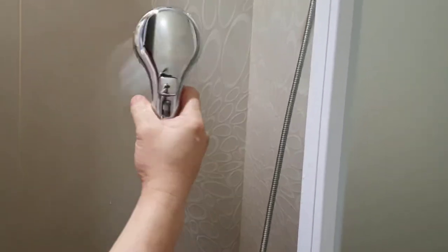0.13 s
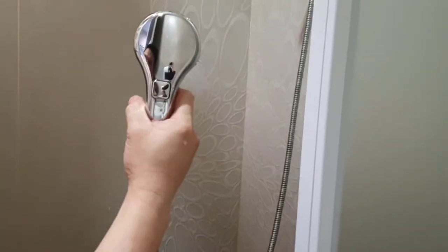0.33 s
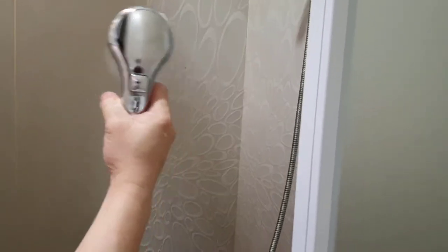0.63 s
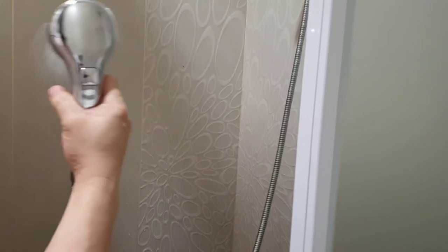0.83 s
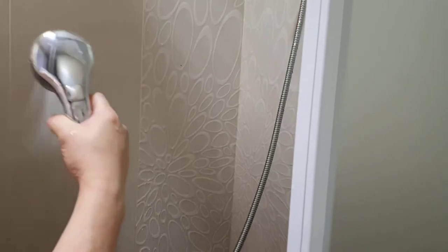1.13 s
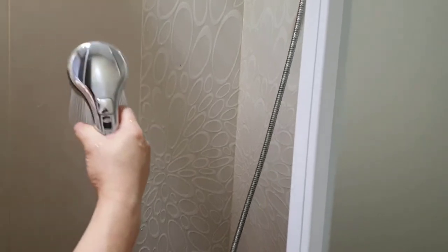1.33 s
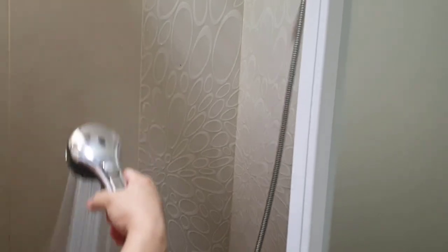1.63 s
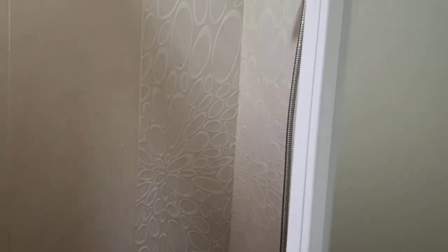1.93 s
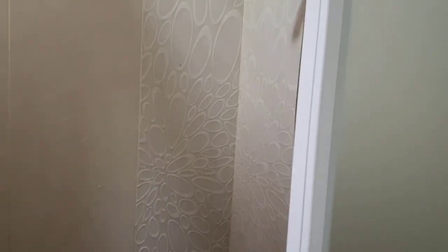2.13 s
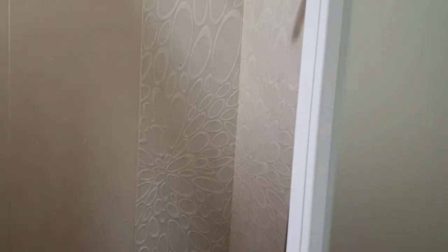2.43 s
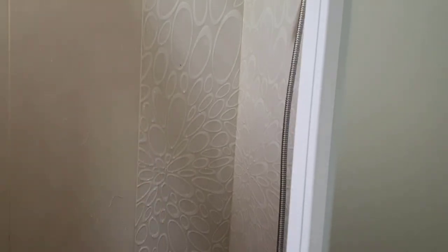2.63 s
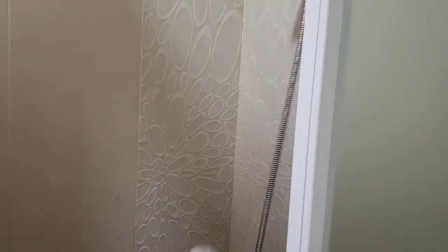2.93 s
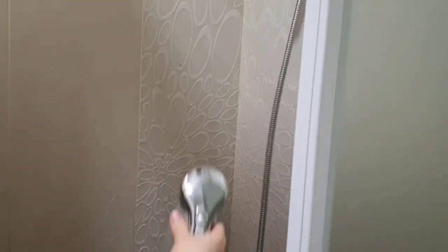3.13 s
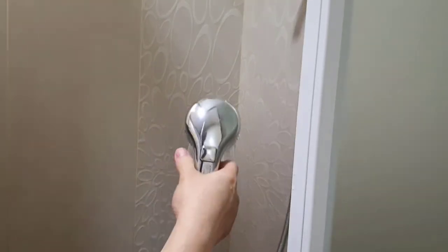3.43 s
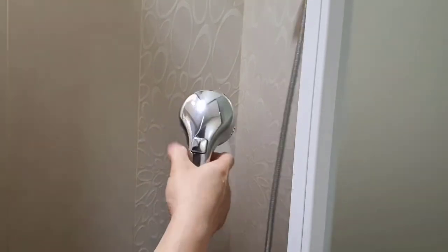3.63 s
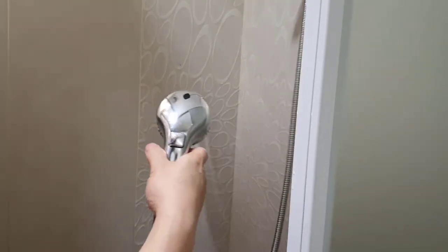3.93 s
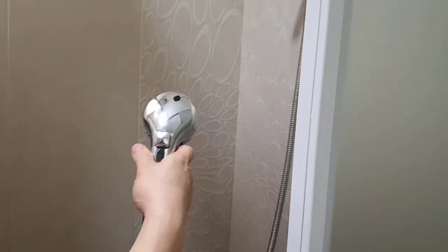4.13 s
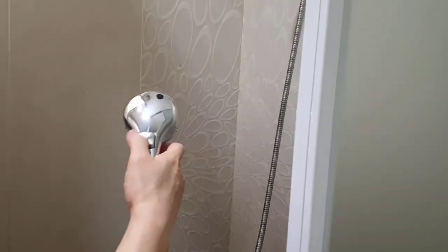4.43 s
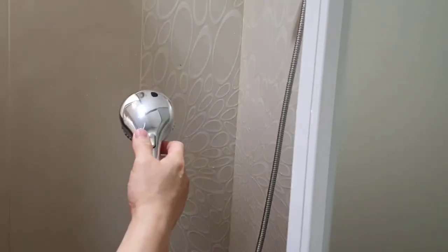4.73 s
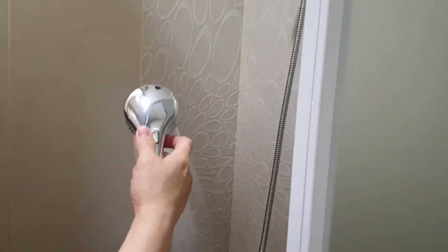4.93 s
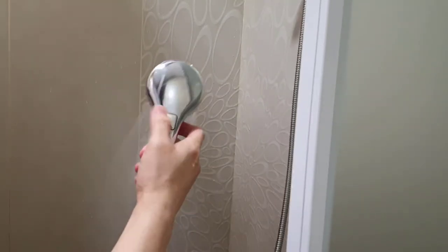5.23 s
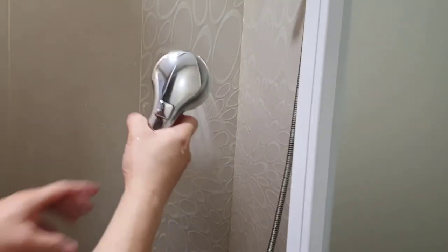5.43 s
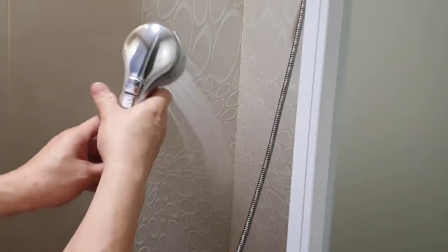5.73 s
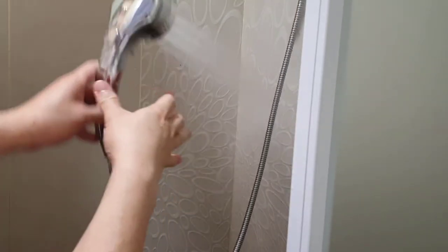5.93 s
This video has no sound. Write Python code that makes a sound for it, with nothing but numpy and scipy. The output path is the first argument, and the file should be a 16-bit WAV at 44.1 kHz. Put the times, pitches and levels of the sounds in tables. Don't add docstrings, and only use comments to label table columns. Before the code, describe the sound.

Hissing shower jets sweep across tile and wet floor with a few watery gulps, pause briefly leaving a low fan hum, then spray again.

```python
import sys
import numpy as np
from scipy import signal
from scipy.fft import rfft, irfft, next_fast_len
from scipy.io import wavfile
from scipy.ndimage import uniform_filter1d

SR = 44100
rng = np.random.default_rng(int(sys.argv[2]) if len(sys.argv) > 2 else 0)


def transcribe(signal):
    frames = np.atleast_2d(signal).T
    limited = np.clip(frames, -1, 1)
    pcm = np.round(limited * 32767).astype(np.int16)
    wavfile.write(sys.argv[1], SR, pcm)


def ratio(d):
    e = np.asarray(d, float) / 20
    return 10 ** e


N = 268745

# f/Hz, level/dB per Hz
AIR_COLOUR = [(45, -15), (90, -5.5), (125, -5), (158, -22.5), (200, -17.5), (300, -18), (390, -24),
              (500, -21.5), (1000, -30.5), (1900, -31), (3500, -46), (7500, -51), (11800, -51),
              (12800, -95)]
# f/Hz, width/Hz, level/dB rms
ROOM_MODES = [(131.9, 9.3, -47.5), (179.5, 14.6, -51.5), (215.2, 9.8, -55.5), (250.4, 9.5, -53),
              (283.9, 11.4, -55), (311.7, 8, -57.5), (610, 39, -61.5), (852, 133, -59.5), (1298, 59, -68.5),
              (1460, 11, -66), (1730, 20, -70), (1917, 16, -70)]
# t/s, peak level/dB
HUM_SWELLS = [(.36, -43.5), (.56, -40), (.82, -37.5), (1.22, -34), (1.42, -36.5), (1.64, -36), (1.9, -37.5),
              (2.09, -40), (2.33, -37.5), (2.63, -34.5), (2.75, -35), (3.05, -34.5), (3.26, -38),
              (3.7, -45), (3.91, -36), (4.34, -36.5), (4.87, -39), (5.2, -33.5), (5.42, -34), (5.64, -36),
              (5.87, -36.5)]
# t/s, peak level/dB
GUSTS = [(.16, -39), (.39, -35), (.46, -56), (.6, -52), (.8, -39), (1.2, -35), (1.55, -44), (1.84, -40),
         (2.0, -38), (2.28, -38), (2.47, -41), (2.61, -34), (3.04, -35.5), (3.26, -48), (3.39, -37),
         (3.76, -34.5), (4.02, -37), (4.34, -37), (4.53, -34), (4.69, -31.5), (4.89, -40), (5.18, -39),
         (5.33, -37.5), (5.5, -34), (5.72, -32), (5.89, -34)]
# f/Hz, correlation/1
EAR_LIKENESS = [(60, 1), (130, 0.91), (290, 0.7), (640, 0.56), (1410, -0.17), (3100, -0.0097),
                (6820, -0.018), (15000, -0.0062)]
# f/Hz, left minus right/dB
EAR_LEAN = [(60, 8), (110, -1.5), (200, -5), (380, 1), (700, -1.5), (1290, -1), (2380, -2.5), (4400, -2.5),
            (8120, -4.5), (15000, 0)]
# t/s, peak level/dB, f/Hz
GULPS = [
    (2.645, -23.5, 830),
    (2.724, -37, 930),
    (2.783, -22.5, 834),
    (3.234, -30, 1043),
    (3.392, -26, 1287),
]
# f/Hz, level/dB per Hz
PANEL_DULL = [(400, -4.5), (700, 0.5), (860, 3), (1050, 1), (1300, 6.5), (2000, -35)]
# f/Hz, level/dB per Hz
PANEL_BRIGHT = [(900, -20), (1300, -3.5), (1500, 0.5), (1750, 3), (2100, 0.5), (2600, -10.5), (3800, -15)]
# t/s, hold/s, drumming level/dB, dull part relative to it/dB
CROSSINGS = [
    (1.848, 0.026, -48, -11),
    (2.5, .04, -49, -12),
    (2.689, 0.035, -35, -5.5),
    (2.793, 0.023, -49, 4),
    (3.223, 0.044, -45, -3),
    (3.307, 0.034, -41, -7),
    (3.402, .06, -42.5, -3.5),
    (4.0, 0.038, -51, -12),
    (4.863, .04, -50.5, -16),
]
# f/Hz, level/dB per Hz
PATTER_COLOUR = [(1000, -26), (1700, -14), (2200, -4.5), (2800, -6), (3250, -5), (4000, -2.5), (4600, -4.5),
                 (7000, -16)]
# f/Hz, width/Hz, level/dB
HOLLOWS = [(3195, 89, -5.5), (3000, 130, -14), (3344, 120, -6.5), (5100, 150, -14), (2740, 120, -9),
           (1980, 160, -22.5)]
# t/s, hold/s, singing above usual/dB
DWELLS = [
    (1.3, 0.3, 4.5),
    (1.78, .06, 6.5),
    (2.157, 0.027, 6),
    (2.24, 0.51, 11),
    (2.952, 0.16, 10),
    (3.687, 0.081, 11),
    (5.055, 0.14, 5.5),
]
# f/Hz, level/dB per Hz
MIST_COLOUR = [(1800, -24.5), (3500, -29), (4900, -2.5), (6000, -3), (7300, 0.), (8600, -3.5), (10500, -11),
               (12800, -34)]
# f/Hz, level/dB per Hz
NOZZLE_BODY = [(2500, -31.5), (4500, -33), (8500, -19.5), (9800, -3.5), (11500, -1.5), (12500, -6),
               (14500, -13)]
# f/Hz, level/dB per Hz
NOZZLE_TOP = [(9000, -36), (12000, -11), (13300, 3), (14300, -3), (15500, -0.5), (17000, -10.5)]
# t/s, landing force level/dB, aim down to the floor/0-1, turn to the listener/0-1
SWEEP = [(0.0, -39.5, 0.46, 0.67), (0.4, -40.5, 0.37, 0.58), (0.8, -46.5, 0.54, 0.67),
         (1.09, -42.5, 0.3, 0.6), (1.22, -37, 0.34, 0.64), (1.44, -39.5, 0.5, .4),
         (1.72, -34.5, 0.61, 0.47), (1.85, -31, 0.66, .4), (2.0, -36, 0.87, 0.5), (2.4, -33.5, 0.72, 0.48),
         (2.82, -35, 0.9, 0.56), (3.12, -32.5, .6, 0.6), (3.35, -31.5, 0.92, 0.45),
         (3.44, -35.5, 0.85, 0.55), (3.85, -33.5, 0.87, 0.32), (5.2, -34.5, 0.51, 0.58),
         (5.52, -37, 0.45, 0.44), (6.09, -36.5, 0.45, 0.62)]
# t/s, level/dB
FLICKS = [
    (.38, 2),
    (.62, -0.5),
    (1.28, 1.5),
    (2.2, 0),
    (2.68, 1),
    (3.0, 0),
    (3.78, 0.5),
    (3.99, 0),
    (5.24, 1.5),
    (5.939, 1),
]

PRESS_S, CUT_DB_PER_S, CUT_DEPTH_DB, DRAIN_DB_PER_S = 3.995, 116, 24, 39
DRIBBLE_S, DRIBBLE_WIDTH_S, DRIBBLE_DB = 4.28, 0.029, 3
LET_GO_S, RISE_S, SURGE_DB, SURGE_DECAY_S = 4.785, 0.086, 3, 0.076
LIFT_S, LIFT_DB_PER_S = 5.977, 59
JETS_BREAK_DB = 31
STALL_T60_S = 0.24


def rms_one(x):
    return x / np.sqrt(np.mean(x ** 2) + 1e-20)


def at_hz(points, hz):
    table_hz, values = np.array(points).T
    return np.interp(np.log(hz), np.log(table_hz), values)


def in_time(rows):
    s, *columns = np.transpose(rows)
    return [np.interp(np.arange(N) / SR, s, c) for c in columns]


def drift(rate):
    r = np.exp(-80 * np.pi * rate / SR)
    noise = rng.standard_normal(N // 40 + 2002)
    slow = signal.lfilter([1], [1, -2 * r, r * r], noise)[2000:]
    return np.interp(np.arange(N) / 40, np.arange(len(slow)), rms_one(slow))


def swell(start_s, hold_s, in_s, out_s):
    corners_s = start_s + np.cumsum([-in_s, in_s, hold_s, out_s])
    return np.interp(np.arange(N) / SR, corners_s, [0, 1, 1, 0])


def bumps(rows, width_s, rest_db):
    t = np.arange(0, N, 64) / SR
    s, db = np.transpose(rows)
    gain = ratio(rest_db) + ratio(db) @ np.exp(-((t - s[:, None]) / width_s) ** 2)
    return np.interp(np.arange(N) / SR, t, gain)


def resonance(x, hz, width_hz):
    r = np.exp(-np.pi * width_hz / SR)
    poles = [1, -2 * r * np.cos(2 * np.pi * hz / SR), r * r]
    return signal.lfilter([(1 - r * r) / 2, 0, (r * r - 1) / 2], poles, x)


def coloured(pair, spectrum):
    size = next_fast_len(N)
    hz = np.arange(size // 2 + 1) * SR / size + 1
    alike = np.clip(at_hz(EAR_LIKENESS, hz), -1, 1)
    (low_hz, low_db), (high_hz, high_db) = spectrum[0], spectrum[-1]
    closed = [(low_hz / 2, low_db - 25), *spectrum, (high_hz * 1.5, high_db - 50)]
    mid, side = rfft(pair, size) * ratio(at_hz(closed, hz))
    ears = np.sqrt(1 + alike) * mid + np.sqrt(1 - alike) * side * [[1], [-1]]
    lean_db = at_hz(EAR_LEAN, hz) * [[0.5], [-0.5]]
    out = irfft(ears * ratio(lean_db), size)[:, :N]
    return out / np.sqrt(np.mean(out.mean(axis=0) ** 2))


def echoes(x, step=30000):
    t = np.arange(round(0.22 * SR)) / SR
    out = np.zeros((2, N + len(t) + 3 * step))
    fade = np.hanning(2 * step)
    padded = np.pad(x, ((0, 0), (step, 2 * step)))
    for i in range(0, N + step, step):
        tail = rng.standard_normal((2, len(t))) * ratio(-60 * t / STALL_T60_S)
        piece = padded[:, i:i + 2 * step] * fade
        out[:, i:i + 2 * step + len(t) - 1] += signal.fftconvolve(piece, tail, axes=1)
    return rms_one(out[:, step:step + N])


def impacts(per_s, spread_db, smear_db, echo_db=None):
    sizes = ratio(spread_db * np.minimum(rng.exponential(1, (2, N)), 5))
    sizes = sizes * rng.choice([-1, 1], (2, N))
    hits = rms_one(sizes * (rng.random((2, N)) < per_s / SR))
    wash = hits + ratio(smear_db) * rng.standard_normal((2, N))
    return wash if echo_db is None else wash + ratio(echo_db) * echoes(hits)


def water(level_db, spectrum, excitation, flicker_db):
    flicker = flicker_db * (drift(12.4) + drift(28))
    return ratio(level_db + flicker) * coloured(excitation, spectrum)


def duct_hum():
    hz = 100.74 + 1.46 * drift(3.93)
    phase = 2 * np.pi * np.cumsum(hz) / SR + [[0], [0.3]]
    return np.sqrt(2) * bumps(HUM_SWELLS, width_s=0.077, rest_db=-45) * np.sin(phase)


def duct_buffeting(white):
    buffet_hz, width_hz = 60.9, 27.72
    lumps = resonance(resonance(white.mean(axis=0), buffet_hz, width_hz), buffet_hz, width_hz)
    even = lumps / np.sqrt(uniform_filter1d(lumps ** 2, size=3500))
    lumps = bumps(GUSTS, width_s=0.033, rest_db=-35) * even
    return np.array([lumps, np.roll(lumps, 30)])


def ventilation():
    out = ratio(-42.5) * coloured(rng.standard_normal((2, N)), AIR_COLOUR)
    white = coloured(rng.standard_normal((2, N)), [(20, 0), (2000, 0), (4000, -40)])
    for hz, width, db in ROOM_MODES:
        wide = width * 1.31
        out = out + ratio(db) * rms_one(resonance(resonance(white, hz, wide), hz, wide))
    return out + (duct_hum() + duct_buffeting(white)) * ratio([[-1.6], [1.4]])


def gulps():
    out = np.zeros((2, N))
    t = np.arange(round(0.08 * SR)) / SR
    envelope = (1 - np.exp(-t / 0.003)) * np.exp(-t / 0.021)
    for s, db, hz in GULPS:
        tone = np.sin(2 * np.pi * hz * t * (1 + 0.27 * t)) * envelope
        at = round(s * SR)
        out[:, at:at + len(t)] += ratio(db - 11.5) * tone * ratio([[-1.5], [1.5]])
    return out


def panel():
    rest_db = -63.5
    drum_rises, dull_rises = [], []
    for s, hold, db, dull_rel_db in CROSSINGS:
        shape = swell(s, hold, in_s=0.14, out_s=0.14)
        drum_rises.append(shape * (db - rest_db))
        dull_rises.append(shape * (db + dull_rel_db - rest_db))
    drum_db = rest_db + np.max(drum_rises, axis=0)
    dull_db = rest_db + np.max(dull_rises, axis=0)
    dull_hits = impacts(500, spread_db=3.5, smear_db=3.5)
    bright_hits = impacts(900, spread_db=4.0, smear_db=4.5, echo_db=-6.0)
    dull = water(dull_db - 2, PANEL_DULL, dull_hits, flicker_db=-1.5)
    return dull + water(drum_db - 3.5, PANEL_BRIGHT, bright_hits, flicker_db=2.24)


def patter(force_db, aim, landing_db):
    drip_db = -38
    floor_db = force_db - 13.5 + 11 * aim
    floor_db = floor_db + np.maximum(0.98 * landing_db, drip_db) + 0.46 * np.maximum(landing_db, 0)
    dwell_db = sum(db * swell(s, hold, in_s=0.034, out_s=0.2) for s, hold, db in DWELLS)
    sing_db = floor_db - 8.5 + dwell_db
    drops = coloured(impacts(2500, spread_db=2.5, smear_db=-2.0, echo_db=4), PATTER_COLOUR)
    singing = np.zeros((2, N))
    for hz, width, db in HOLLOWS:
        singing += ratio(db + 8.0 + 0.74 * drift(11.0)) * resonance(drops, hz, width)
    return ratio(floor_db + 0.79 * drift(16)) * drops + ratio(sing_db) * singing


def mist(force_db, flow_db):
    level_db = force_db + 0.99 * flow_db + 0.53 * np.minimum(flow_db + JETS_BREAK_DB, 0)
    hits = impacts(6000, spread_db=2.0, smear_db=1.0, echo_db=3.5)
    return water(level_db, MIST_COLOUR, hits, flicker_db=0.42)


def pressure():
    t = np.arange(N) / SR
    shut = np.maximum(t - PRESS_S, 0)
    drain_s = np.maximum(shut - CUT_DEPTH_DB / CUT_DB_PER_S, 0)
    lost = -np.minimum(CUT_DB_PER_S * shut, CUT_DEPTH_DB) - DRAIN_DB_PER_S * drain_s
    lost = lost + DRIBBLE_DB * np.exp(-((t - DRIBBLE_S) / DRIBBLE_WIDTH_S) ** 2)
    back = np.clip((t - LET_GO_S) / RISE_S, 0, 1)
    surge = SURGE_DB * np.exp(-np.maximum(t - LET_GO_S - RISE_S, 0) / SURGE_DECAY_S)
    return (1 - back) ** 2.26 * lost + back * surge


def jets(force_db, turn, flow_db, late_db):
    swing_db = force_db - force_db.mean()
    body_db = -39.5 + 0.59 * swing_db + 9 * turn
    body_db = body_db + 1.08 * flow_db - 0.5 * np.maximum(flow_db, 0)
    body_db = body_db + 2.5 * np.minimum(flow_db + JETS_BREAK_DB, 0)
    body_hits = impacts(9000, spread_db=2.0, smear_db=10.5, echo_db=2)
    body = water(body_db, NOZZLE_BODY, body_hits, flicker_db=0.51)
    top_db = -41 + 0.28 * swing_db + 5.5 * turn
    top_db = top_db + 0.82 * late_db + 4 * np.minimum(late_db + 30, 0)
    top_db = top_db + 3.5 * swell(5.55, 0.31, in_s=0.3, out_s=0.041)
    top_hits = impacts(9000, spread_db=7.5, smear_db=9.0, echo_db=-8)
    return body + water(top_db, NOZZLE_TOP, top_hits, flicker_db=0.9)


def scene():
    t = np.arange(N) / SR
    force_db, aim, turn = uniform_filter1d(in_time(SWEEP), size=400)
    force_db = force_db + sum(db * np.exp(-((t - s) / 0.032) ** 2) for s, db in FLICKS)
    flow_db = pressure() - LIFT_DB_PER_S * np.maximum(t - LIFT_S, 0)
    fall_s = 0.023
    landing_db = np.minimum(flow_db, np.interp(t - fall_s, t, flow_db) + 5)
    background = ventilation() + gulps() + panel()
    landing = patter(force_db, aim, landing_db) + mist(force_db, flow_db)
    return background + landing + jets(force_db, turn, flow_db, landing_db)


def low_pass(x):
    return signal.sosfilt(signal.butter(12, 15780, fs=SR, output="sos"), x)


def record(dry):
    bass_cut = signal.butter(3, 42.4, "high", fs=SR, output="sos")
    mix = signal.sosfilt(bass_cut, dry)
    return low_pass(mix)


dry = scene()
out = record(dry)
transcribe(out)
```